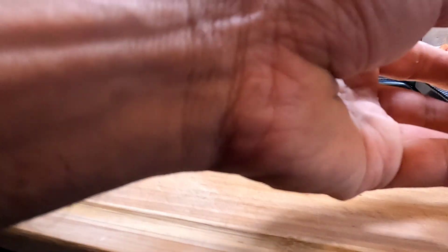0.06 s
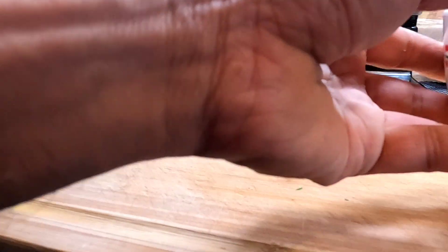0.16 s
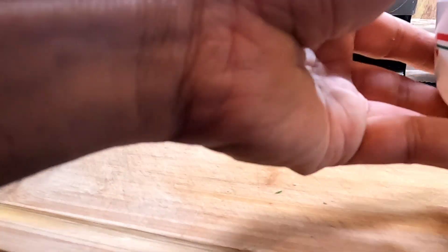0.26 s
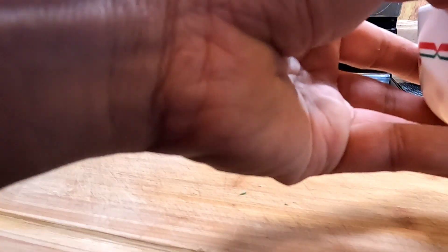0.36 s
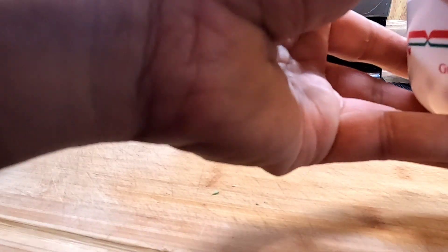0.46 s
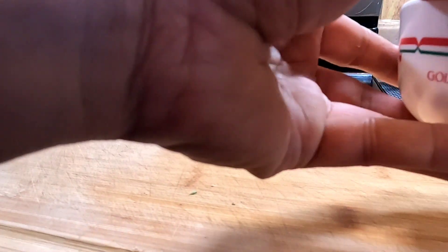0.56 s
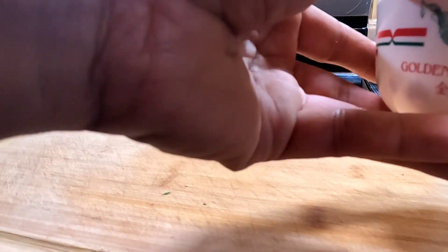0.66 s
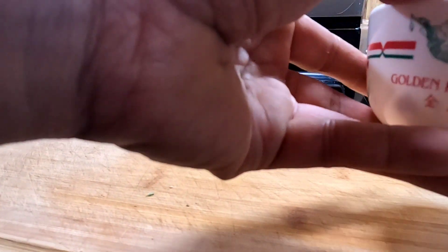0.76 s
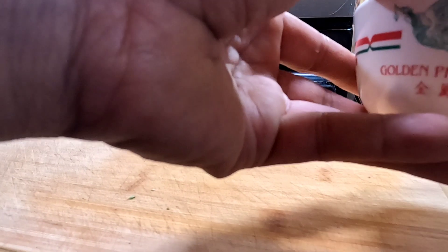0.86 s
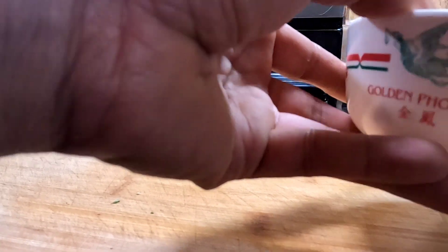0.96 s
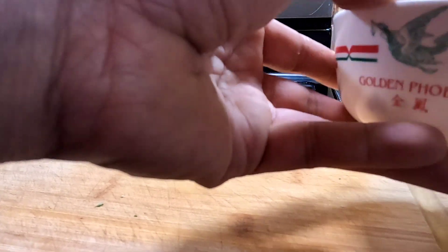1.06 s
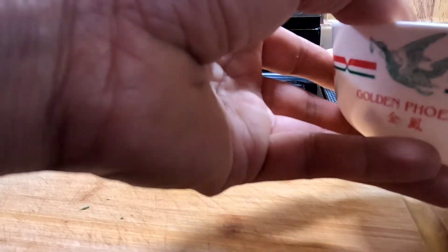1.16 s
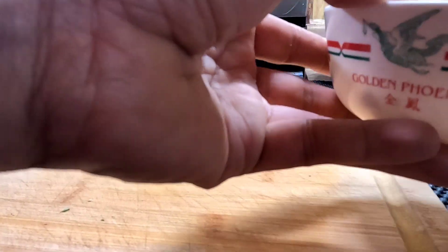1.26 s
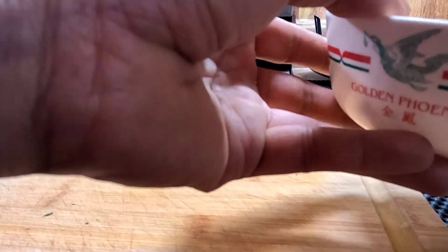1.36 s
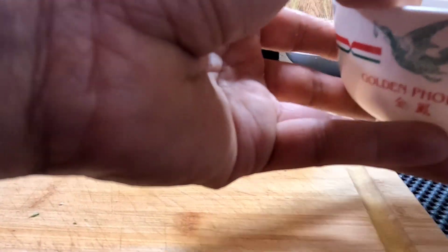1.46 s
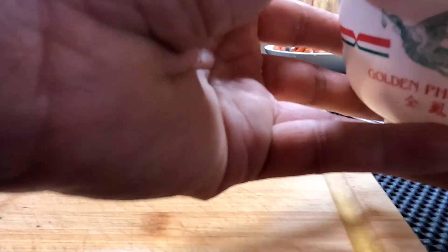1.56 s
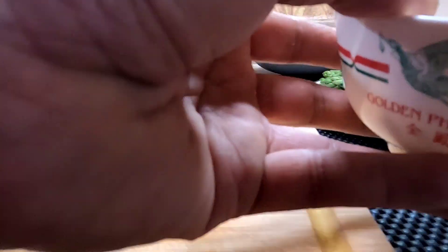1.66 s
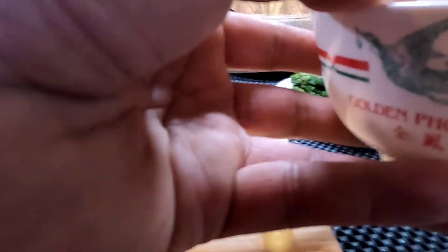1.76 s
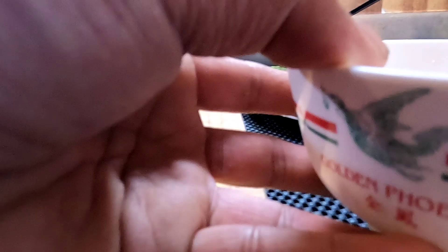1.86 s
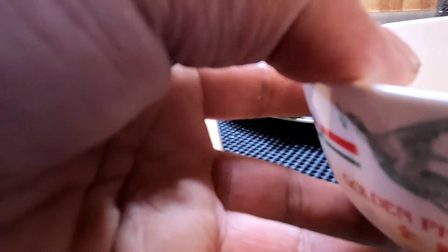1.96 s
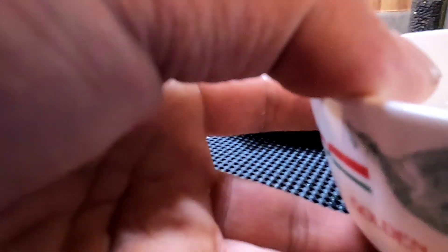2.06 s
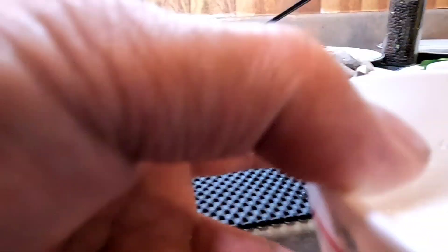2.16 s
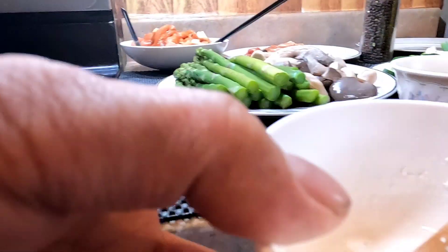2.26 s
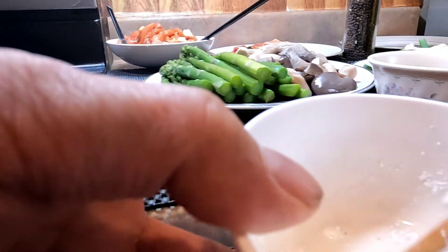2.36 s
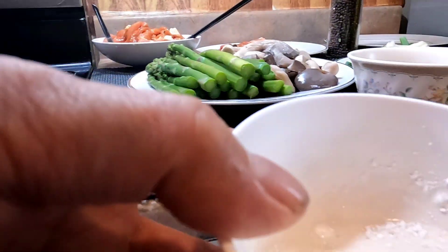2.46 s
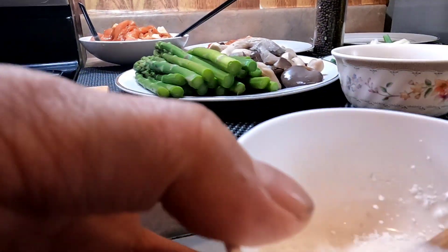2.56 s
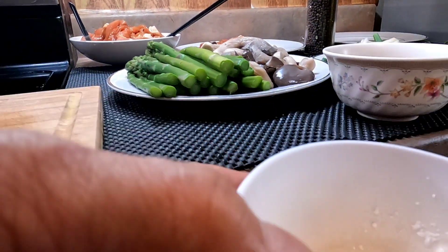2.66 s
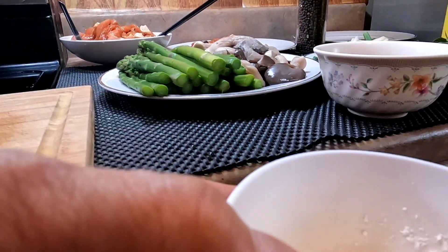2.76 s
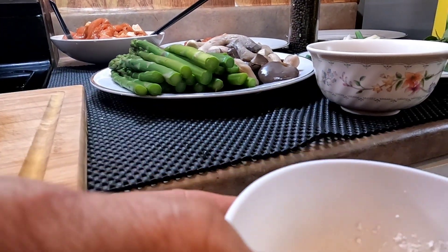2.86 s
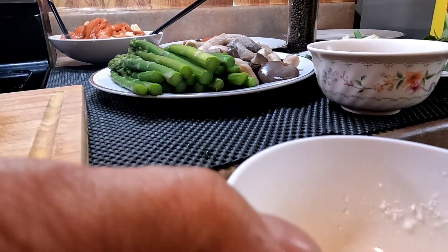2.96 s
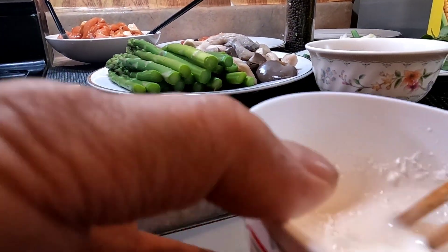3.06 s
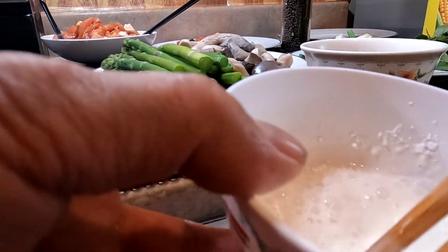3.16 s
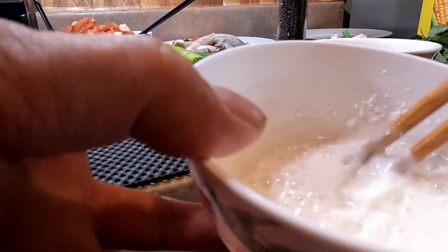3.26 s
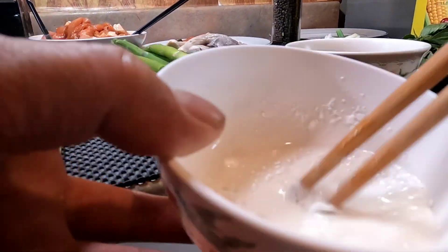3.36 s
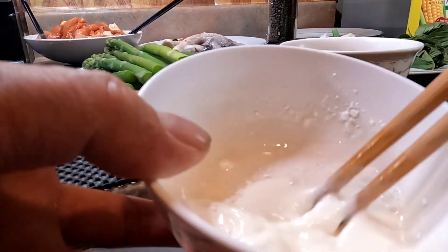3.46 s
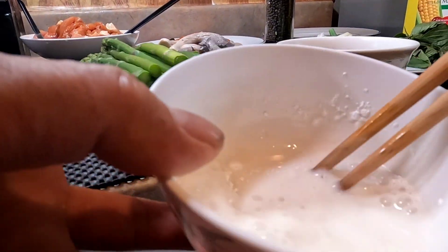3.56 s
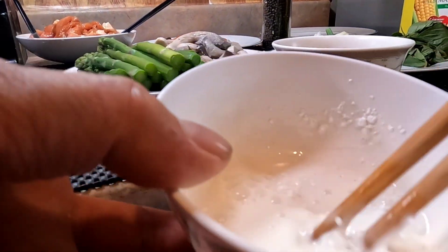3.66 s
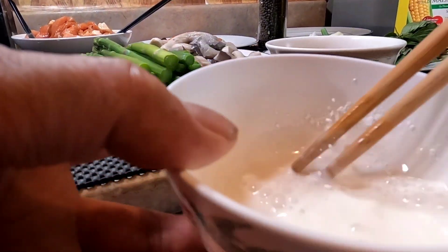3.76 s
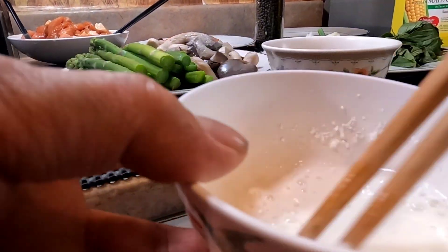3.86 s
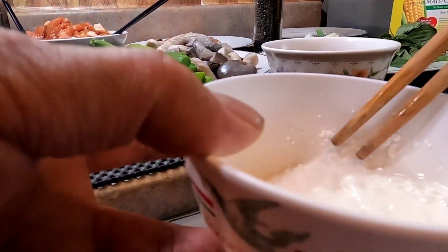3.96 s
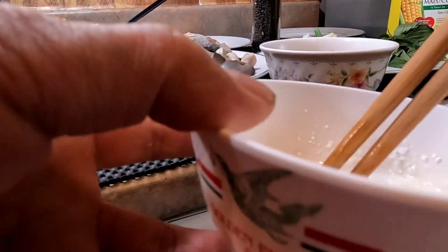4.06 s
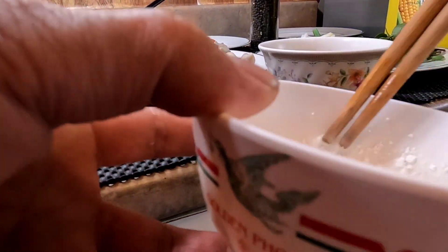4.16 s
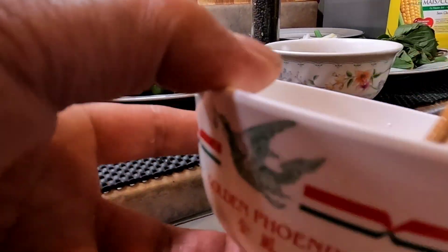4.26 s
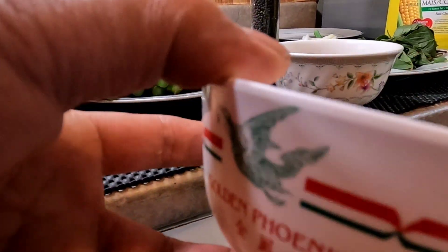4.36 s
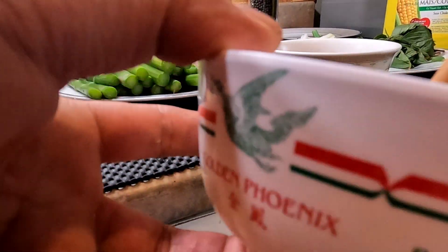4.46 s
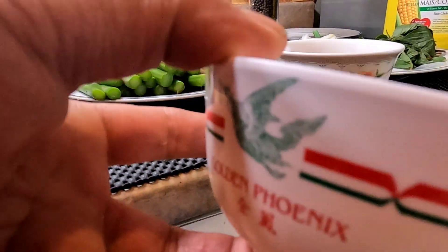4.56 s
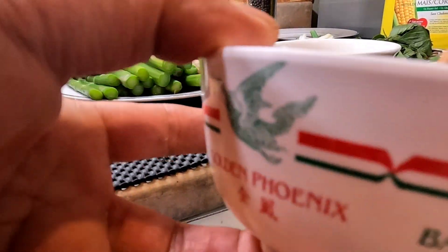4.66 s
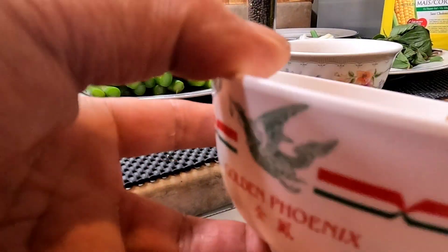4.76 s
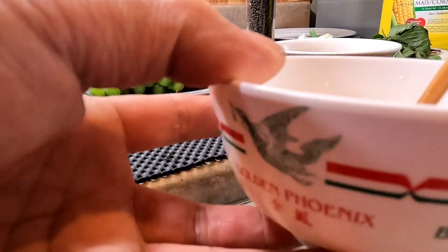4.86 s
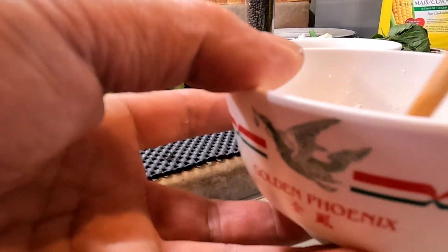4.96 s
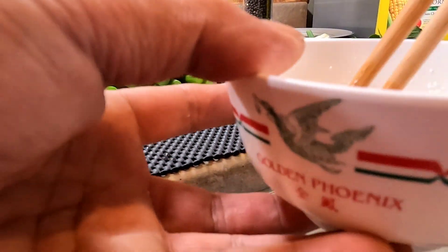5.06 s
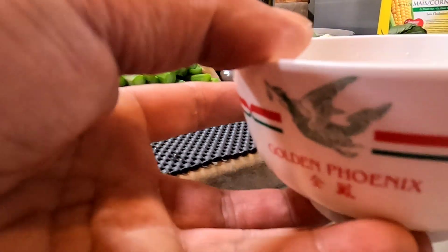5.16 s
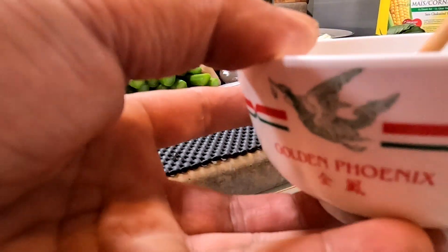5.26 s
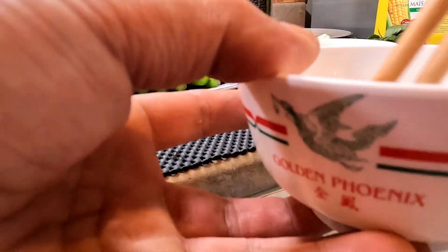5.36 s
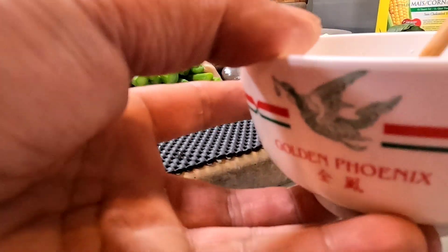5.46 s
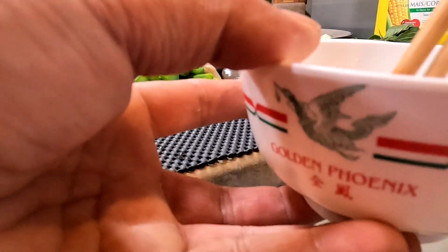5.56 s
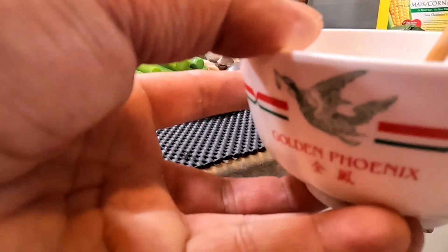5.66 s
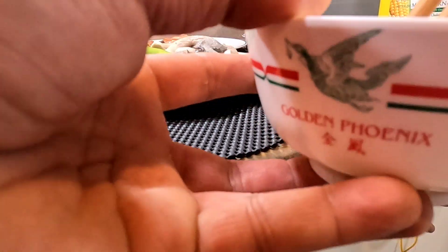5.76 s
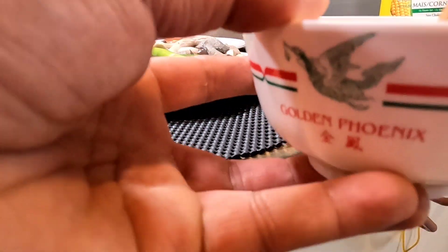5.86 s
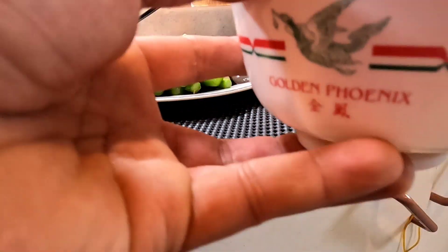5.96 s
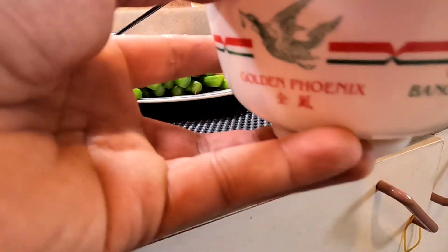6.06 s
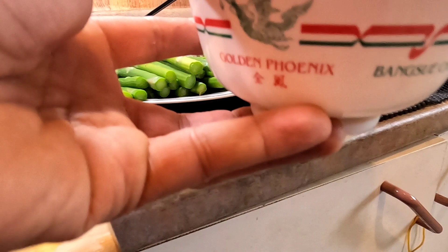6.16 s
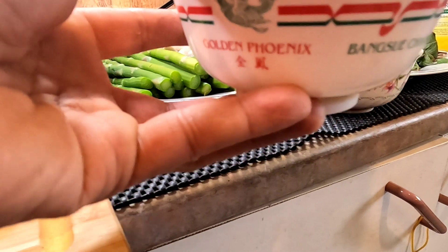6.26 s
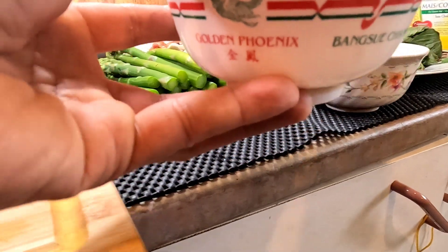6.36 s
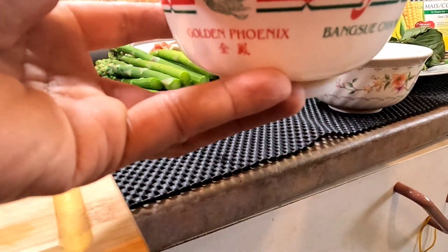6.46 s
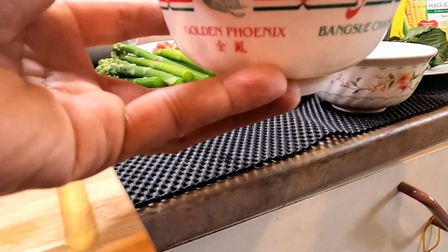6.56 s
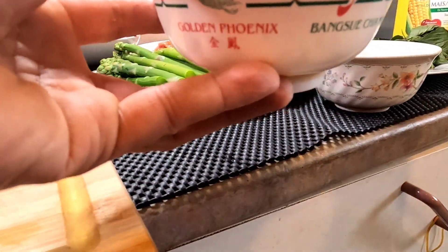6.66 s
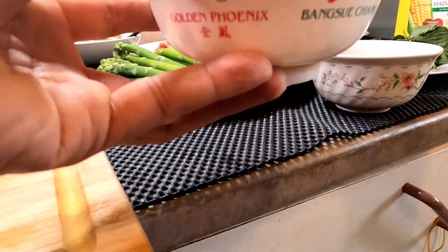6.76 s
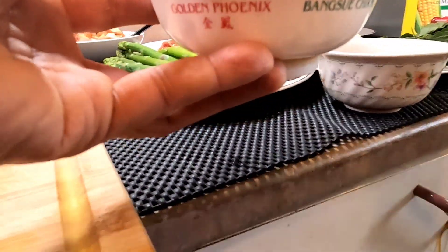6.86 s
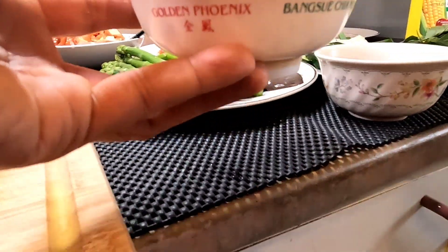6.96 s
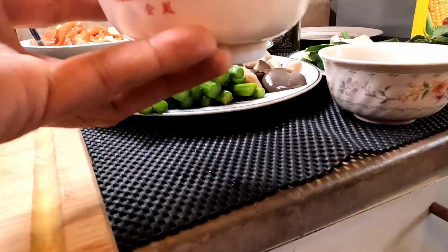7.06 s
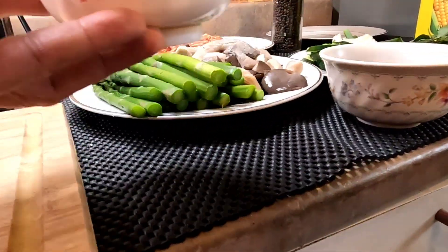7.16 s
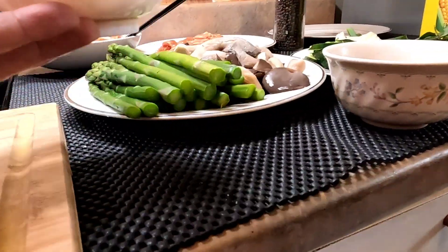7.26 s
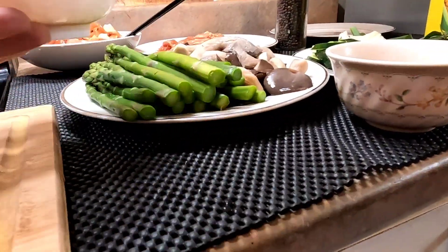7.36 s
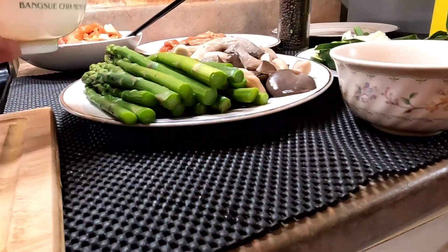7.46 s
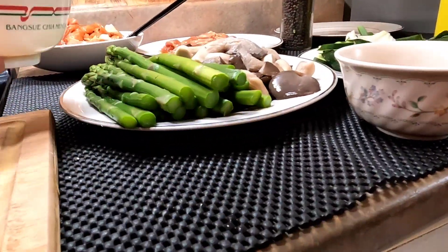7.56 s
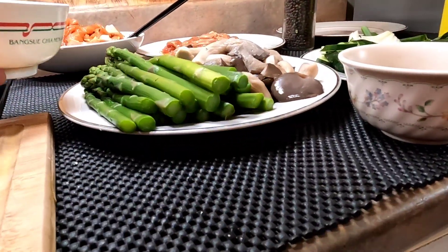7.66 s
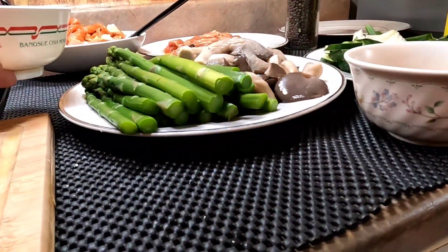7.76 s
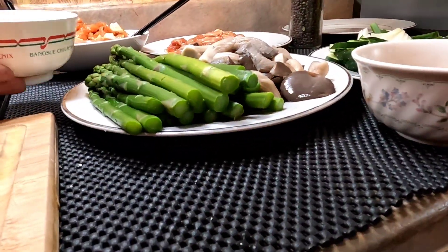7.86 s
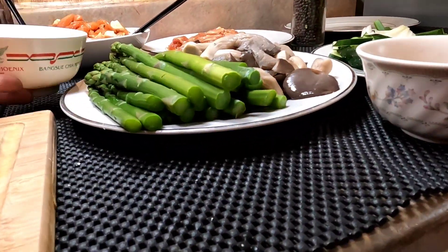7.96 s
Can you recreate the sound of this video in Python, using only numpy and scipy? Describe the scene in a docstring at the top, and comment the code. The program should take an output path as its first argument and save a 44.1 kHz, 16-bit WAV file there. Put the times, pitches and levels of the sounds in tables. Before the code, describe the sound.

Wooden chopsticks whip powder into water in a hard, hand-held bowl, close to the microphone in a small kitchen. The tips click against the wall and scrape the wet inside in quick, uneven strokes, with light sloshing and tiny plops. The stirring stops, three sharp raps land on the rim, and a few faint dish ticks follow. A low appliance hum and a thin high whine stay underneath.

```python
"""A small kitchen: close up, wooden chopsticks whip powder into water in a hard, hand-held bowl.
The sticks rap the wall and rebound, their tips scrape the wet inside, trapped air plops and glides up;
last come three raps on the rim and faint ticks on a dish. The room answers over an appliance hum and
a thin throbbing whine, while the camera's noise suppressor ducks the quiet hiss."""
import sys
import numpy as np
from scipy import signal
from scipy.fft import rfft, irfft
from scipy.io import wavfile
from scipy.ndimage import uniform_filter1d, minimum_filter1d

SR = 44100
rng = np.random.default_rng(int(sys.argv[2]) if len(sys.argv) > 2 else 0)


def persist_wave(psi):
    """Save psi, clipped to +-1, as 16-bit WAV."""
    counts = np.round(np.clip(psi, -1, 1) * 32767).astype(np.int16)
    wavfile.write(sys.argv[1], SR, np.atleast_2d(counts).T)


N = 353223
T = np.arange(N) / SR
FREQS = np.fft.rfftfreq(N, 1 / SR)


def undb(db):
    """Decibels to gain."""
    return 10 ** (np.asarray(db) / 20)


def along(hz, table):
    """Read (f/Hz, value) rows on a log-frequency axis."""
    f, v = np.transpose(table)
    return np.interp(np.log(np.maximum(hz, 1)), np.log(f), v)


def colour(x, gain):
    """Filter by gain(f) and scale to rms 1."""
    y = irfft(rfft(x) * gain(np.fft.rfftfreq(x.shape[-1], 1 / SR)), x.shape[-1])
    return y / np.sqrt(np.mean(y ** 2))


def walk(rate):
    """Random values joined by ramps, rate of them a second."""
    knots = np.arange(0, T[-1] + 1, 1 / rate)
    return np.interp(T, knots, rng.standard_normal(len(knots)))


def clicks(rate, spread_db):
    """Random impulses, mostly small, now and then a large one."""
    hit = rng.random(N) < rate / SR
    return hit * undb(spread_db * rng.exponential(size=N)) * rng.choice([-1., 1.], N)


def add(out, s, sound):
    """Place a sound at s seconds."""
    i = int(s * SR)
    out[i:i + len(sound)] += sound[:N - i]


def room_tone():
    """The bed: a low rumble and thin hiss that swell together."""
    spectrum = [(12, -35.5), (20, 6), (40, -10.5), (84, -28.5), (105, -21.5), (223, -13.5), (263, -16),
                (733, -37), (966, -37), (1170, -30.5), (1880, -42.5), (4310, -42.5), (4820, -35),
                (5380, -38.5), (15000, -55.5)]  # still kitchen air: f/Hz, relative level/dB
    mid, side = (colour(rng.standard_normal(N), lambda f: undb(along(f, spectrum)) * (f > 15))
                 for _ in range(2))
    return undb(-53 + 2 * walk(5.4)) * (mid + undb(-7) * side * np.array([[1], [-1]]))


def appliance_hum():
    """An appliance drones in narrow bands of noise."""
    bands = [(120, 2.9, -71), (145, 30, -62), (224.8, 6, -65), (1050, 4.5, -84), (5230, 9.1, -77)]  # hum bands: f/Hz, half-width/Hz, level/dB
    return sum(undb(db) * colour(rng.standard_normal(N), lambda f: 1 / (1 + ((f - hz) / width) ** 2))
               for hz, width, db in bands)


def whine(pitch_hz=4690, throb_hz=59):
    """A thin, high tone that throbs unevenly."""
    throb = (1 + np.cos(2 * np.pi * throb_hz * T + 3 * walk(3.8))) ** 2 * undb(2 * walk(25))
    return undb(-78) * throb * np.sin(2 * np.pi * pitch_hz * T + 1.2 * walk(40))


def handling_rumble(until_s=6.6):
    """The hand on the camera rumbles while the bowl is worked."""
    rumble = colour(rng.standard_normal(N), lambda f: (f > 15) / (1 + (f / 45) ** 4))
    return undb(-57.5 + 4 * walk(19)) * rumble * np.clip((until_s - T) / 0.22, 0, 1)


def room_reverb(x, build_s=0.0036, side_db=-6):
    """The small room's diffuse stereo tail, each band dying at its own rate."""
    bands = [(920, 0.3, -35.5), (2050, 0.36, -45.5), (3850, 0.37, -44.5), (8710, 0.34, -42),
             (15600, 0.062, -35.5)]  # reverb bands: f/Hz, T60/s, level/dB
    t = np.arange(SR // 2) / SR
    mid, side = rng.standard_normal((2, len(t)))
    tail = 0
    for hz, t60, db in bands:
        band = lambda f: np.exp(-2 * np.log2(np.maximum(f, 1) / hz) ** 2)
        pair = colour(mid, band) + undb(side_db) * colour(side, band) * np.array([[1], [-1]])
        envelope = 1000 ** (-t / t60) * (1 - np.exp(-t / build_s))
        tail += undb(db) * np.sqrt(hz / SR) * pair * envelope
    return signal.fftconvolve(x[None], tail, axes=1)[:, :N]


def dish_ticks():
    """A lightly touched dish rings on its own modes."""
    touches = [(7.712, -47), (7.918, -53)]  # touches on the dish: t/s, level/dB
    modes = [(3750, -12, 0.092), (3910, -9, 0.065), (5300, 1.5, 0.044), (5700, 2, 0.056)]  # dish modes: f/Hz, level/dB, T60/s
    out, t = np.zeros(N), np.arange(SR // 4) / SR
    for s, level_db in touches:
        ring = sum(undb(db + 3.6 * rng.standard_normal()) * np.sin(2 * np.pi * hz * t)
                   * 1000 ** (-t / t60) for hz, db, t60 in modes)
        add(out, s, undb(level_db) * ring)
    return out


def wet_wall(f):
    """Gain of the broad resonances that scraping excites in the wet wall."""
    bands = [(1300, 120, 9), (1630, 120, 8), (2400, 150, 11), (3600, 240, 10), (5500, 350, 6),
             (7600, 800, 10), (10700, 500, 4)]  # wall resonances: f/Hz, width/Hz, boost/dB
    return undb(sum(db / (1 + (2 * (f - hz) / width) ** 2) for hz, width, db in bands))


def bubble(hz, t60, glide, t):
    """A closing cavity: a damped tone that swells over two cycles while its pitch climbs."""
    swell = (1 - np.exp(-t * hz)) ** 2
    return np.sin(2 * np.pi * hz * t * (1 + glide * t / t60)) * 1000 ** (-t / t60) * swell


def bubble_swarm(lo_hz, spectrum, ring_cycles):
    """Small bubbles of many sizes, pitched over an octave and a half."""
    t, out = np.arange(SR // 40) / SR, 0
    for hz in lo_hz * 2 ** np.arange(0, 1.6, 1 / 7):
        births = clicks(rate=40, spread_db=1.6)
        pops = signal.fftconvolve(births, bubble(hz, ring_cycles / hz, 0.12, t))[:N]
        out += undb(along(hz, spectrum)) * wet_wall(hz) * hz * pops
    return out / np.std(out)


def wall_song(drift=0.025, flicker_db=5):
    """The rubbed wall sings in narrow bands that drift and come and go."""
    bands = [(1250, 110, 0), (1550, 130, -2), (2320, 70, 0), (2650, 110, -3), (3450, 200, -2),
             (4150, 250, -6), (7600, 600, -7)]  # singing bands: f/Hz, width/Hz, relative level/dB
    out = 0
    for hz, width, db in bands:
        phase = 2 * np.pi * hz * np.cumsum(1 + drift * walk(9)) / SR
        gain = undb(db + flicker_db * walk(28))
        out += gain * (walk(width) * np.sin(phase) + walk(width) * np.cos(phase))
    return out / np.std(out)


def scrape(spectrum, lo_hz, hi_hz, slips_per_s):
    """Tiny slips of the tips; each third-octave swells on its own as the wetted wall changes shape."""
    treble_ride = [(0, -6.5), (.5, 7.5), (1, 2.5), (1.5, -2), (2, 1.5), (2.3, 1.5), (2.6, 4), (3, 0),
                   (3.5, -0.5), (3.75, 2), (4, 6.5), (4.3, 11), (4.7, 12), (5.1, 1), (5.3, 5), (5.5, 0.5),
                   (5.75, -6.5), (6, -1), (6.3, 3.5)]  # scrape brightness above 5 kHz: t/s, level/dB
    treble_db = np.interp(T, *np.transpose(treble_ride))
    slips = rfft(clicks(slips_per_s, spread_db=1.5)) * wet_wall(FREQS) * undb(along(FREQS, spectrum))
    out = 0
    for hz in lo_hz * 2 ** np.arange(0, np.log2(hi_hz / lo_hz), 1 / 3):
        band = np.clip(1 - 3 * np.abs(np.log2(np.maximum(FREQS, 1) / hz)), 0, 1)
        flicker_db = 6 * min(1, 4500 / hz) * walk(16)
        out += irfft(slips * band, N) * undb(flicker_db + treble_db * (hz > 5000))
    return out / np.std(out)


def stroke_envelopes(swell_db=24.5, sag_db_per_s=45.5, lift_db_per_s=699):
    """Slosh and grit gains: each sweep swells, slows while held and stops as the tips lift."""
    # sweeps through the paste: peak t/s, swell/s, hold/s, slosh level/dB, grit level/dB
    sweeps = [(0.005, 0.039, 0.03, -49.5, -42.5), (0.103, 0.063, 0.033, -40, -42.5),
              (0.171, 0.012, 0.058, -64, -51.5), (0.255, .015, 0.085, -51.5, -54.5),
              (0.357, 0.013, 0.049, -52, -47), (0.591, 0.072, 0.064, -60, -54),
              (0.81, .01, 0.072, -65, -53), (1.016, 0.0042, 0.031, -53, -48),
              (1.088, 0.016, 0.0087, -49.5, -52), (1.274, 0.04, 0.027, -45.5, -43.5),
              (1.396, 0.018, 0.14, -47.5, -46), (1.581, 0.0032, 0.069, -50.5, -46.5),
              (1.676, 0.08, 0.079, -52, -48), (1.725, 0.029, 0.065, -44.5, -48.5),
              (1.847, 0.1, 0.04, -52, -46), (2.015, 0.093, 0.011, -39.5, -36.5),
              (2.064, 0.019, 0.1, -47, -47), (2.269, 0.035, 0.036, -39, -37), (2.37, .008, 0.11, -60, -44),
              (2.527, 0.018, 0.031, -45.5, -38.5), (2.621, .01, 0.081, -46, -48),
              (2.756, 0.0045, 0.056, -41.5, -42), (2.85, 0.012, 0.023, -47, -48),
              (3.026, 0.09, 0.0073, -38, -34.5), (3.115, 0.073, 0.023, -42, -39),
              (3.168, 0.016, 0.027, -47, -58), (3.273, 0.073, 0.013, -37, -32),
              (3.373, 0.15, 0.037, -56, -40.5), (3.517, 0.033, 0.027, -40, -31),
              (3.59, .02, 0.067, -57, -47), (3.75, 0.038, 0.027, -42, -35.5),
              (3.834, 0.011, 0.047, -44.5, -48.5), (3.962, 0.15, 0.068, -49, -46),
              (4.163, 0.0098, 0.044, -51, -49.5), (4.279, 0.015, 0.099, -68, -52),
              (4.429, 0.038, 0.018, -48.5, -45.5), (4.649, 0.0079, 0.042, -56.5, -57),
              (4.839, 0.0052, 0.074, -54, -53.5), (5.05, 0.033, 0.075, -37.5, -44),
              (5.148, 0.02, 0.18, -61, -52), (5.296, 0.04, 0.028, -44, -43.5),
              (5.382, 0.055, 0.035, -42, -41.5), (5.473, 0.059, 0.055, -40.5, -46.5),
              (5.597, 0.081, 0.021, -44.5, -41.5), (5.716, 0.063, 0.029, -41.5, -35),
              (5.785, 0.037, 0.061, -43, -40), (5.889, 0.021, 0.098, -47, -42),
              (6.108, 0.014, 0.063, -50.5, -44.5), (6.233, 0.015, 0.045, -91, -74)]
    power = np.zeros((2, N))
    for s, swell, hold, slosh_db, grit_db in sweeps:
        since = T - s
        rise_db = swell_db * since / swell
        fall_db = -sag_db_per_s * since - lift_db_per_s * np.maximum(since - hold, 0)
        shape_db = np.maximum(np.minimum(rise_db, fall_db), -90)
        power += undb(np.array([[slosh_db], [grit_db]]) + shape_db) ** 2
    return np.sqrt(power)


def whisking():
    """The tips hiss on the wall (grit) and paste slops in the middle (slosh); both carry bubbles."""
    grit_eq = [(1470, -49), (2500, -3.5), (3060, -2), (3450, -3.5), (6780, -9), (7530, -12.5), (12300, -14),
               (13600, -16), (15000, -56)]  # tips on the wall: f/Hz, relative level/dB
    slosh_eq = [(290, -61.5), (500, -17.5), (828, -7.5), (1360, -5.5), (2010, -2.5), (2610, -17.5),
                (3050, -27.5), (4000, -11), (5200, -56), (8800, -120)]  # slopping paste: f/Hz, relative level/dB
    grit = undb(-2.5) * scrape(grit_eq, 2000, 18000, slips_per_s=9000)
    grit += undb(-11) * bubble_swarm(2200, grit_eq, ring_cycles=50)
    slosh = undb(-6.5) * scrape(slosh_eq, 423, 5000, slips_per_s=6000) + undb(-3) * wall_song()
    slosh += undb(-6) * bubble_swarm(1000, slosh_eq, ring_cycles=36)
    surge = undb(2.5 * walk(35))
    return surge * np.sum(stroke_envelopes() * [slosh, grit], axis=0)


def plops():
    """Large air pockets close under the tips, each with a softer, shorter, faster-gliding partner."""
    pockets = [(0.1362, -7.5, 1130, 0.0061), (0.269, -35.5, 2820, 0.023), (1.0395, -31.5, 3550, 0.022),
               (1.106, -36, 2300, 0.019), (1.305, -35, 2300, 0.045), (1.314, -25.5, 3550, .015),
               (1.401, -23, 2240, 0.055), (1.464, -41, 2260, .04), (1.53, -34, 1340, 0.025),
               (1.791, -37.5, 1390, .03), (1.891, -39, 1414, 0.062), (1.988, -33, 1730, .018),
               (2.015, -16.5, 1540, 0.016), (2.045, -19, 1184, 0.018), (2.244, -21.5, 2610, 0.025),
               (2.3486, -17, 1364, 0.019), (2.372, -30, 2560, 0.022), (2.5627, -16.5, 1350, 0.013),
               (2.571, -21, 1320, 0.018), (2.593, -20.5, 2540, 0.02), (2.754, -22, 2640, 0.022),
               (2.759, -31, 3180, 0.024), (2.817, -17.5, 1670, 0.011), (2.8395, -27, 2560, 0.03),
               (2.864, -20.5, 1257, 0.041), (2.8647, -26, 2860, .02), (2.908, -16.5, 1202, 0.032),
               (3.02, -25, 1790, 0.019), (3.184, -27, 1700, 0.012), (3.272, -23, 3610, 0.019),
               (3.3152, -9, 1700, 0.0085), (3.32, -23, 2470, 0.034), (3.374, -23, 1297, 0.042),
               (3.376, -23, 2520, 0.022), (3.398, -23, 1360, 0.033), (3.418, -33.5, 1050, 0.051),
               (3.527, -22, 4310, 0.018), (3.5458, -17, 4060, 0.011), (3.5789, -21, 1460, 0.015),
               (3.755, -33, 2840, 0.089), (3.81, -22.5, 2410, .025), (3.881, -36.5, 1460, 0.072),
               (4.162, -22.5, 2510, 0.025), (4.685, -29.5, 1570, 0.031), (4.824, -25.5, 2840, 0.015),
               (5.036, -14, 3260, 0.023), (5.102, -28, 2320, 0.051), (5.3776, -31.5, 2395, 0.062),
               (5.415, -15, 1400, 0.017), (5.467, -31.5, 1220, 0.049), (5.4848, -31.5, 1360, 0.05),
               (5.506, -26, 1140, 0.024), (5.605, -30.5, 1165, 0.042), (5.7143, -26.5, 1640, 0.029),
               (5.7407, -4.5, 1280, 0.0053), (5.786, -21.5, 2480, 0.028), (5.8958, -27, 1248, 0.05)]  # trapped air: t/s, level/dB, f/Hz, T60/s
    out, t = np.zeros(N), np.arange(SR // 10) / SR
    for s, db, hz, t60 in pockets:
        plop = bubble(hz, t60, 0.14, t) + undb(-5.5) * bubble(hz, t60 / 2, 0.23, t)
        add(out, s, undb(db) * plop)
    return out


def stick_raps(contact_s=0.00021, rebound_s=0.0022, crack_t60=0.014, push_s=0.004):
    """Each blow and its two rebounds ring the bowl's modes; where it lands sets the tone."""
    # blows on the bowl: t/s, level/dB, then tone as thud/dB, hollow/dB, clack/dB, edge/dB
    blows = [(0.1362, -27.5, -9, 11, 6, -29), (0.3601, -28.5, -10, -3.5, -6, -11),
             (0.5523, -35, 0.5, 7, 6, -9), (0.772, -19.5, -8.5, -1, -1, 0.5),
             (0.97, -16.5, -15, -6.5, -7.5, 1.5), (0.9745, -17.5, -17.5, -10.5, -8.5, 1),
             (1.187, -11, -20.5, -9, -14.5, -2.5), (1.19, -12.5, -27.5, -12.5, -8.5, -2.5),
             (1.3964, -12, -44.5, -20, -8, -9), (1.3992, -13.5, -45, -12, -7, -10.5),
             (1.508, -34.5, -43, -13, 2, -9), (1.5795, -33.5, -34, 0.5, -2, -37),
             (1.633, -37, -32, -8, 4, -20), (1.852, -38, -28, -23, -23, -5),
             (1.989, -31.5, -24, -22, -3, -11), (2.1635, -35, 10, 12, 7, -2.5),
             (2.2436, -23, -28.5, -15, -9, -10), (2.3483, -22, -35, -14.5, -8.5, 0),
             (2.59, -28, -36, -13, -3.5, 5.5), (2.603, -34, -15, 6.5, 0, -20),
             (2.751, -22, -26.5, -7, -12.5, -27.5), (2.816, -30, -31, 0, -7, -21),
             (2.84, -27.5, -30, -7.5, -4.5, -20.5), (2.868, -21, -37, -17.5, -16.5, -34),
             (2.878, -7, -24.5, -11.5, -6, -7), (2.907, -38, -34, 11, 10.5, -27.5),
             (2.9476, -40.5, 13.5, 22.5, 12, -26.5), (3.1427, -9.5, -21.5, -7.5, -8, -10),
             (3.186, -40, -14.5, 15, 8.5, -23), (3.268, -15, -27.5, -15.5, -14, -6),
             (3.282, -20.5, -26.5, -7, -6, -20), (3.545, -21, -29.5, 1, -6, -26),
             (3.577, -37, -22, 1, 1, 4.5), (3.591, -36, -13.5, 10, 1, -10),
             (3.652, -16, -16, -2.5, -3, -7.5), (3.7036, -35.5, 5, 18, 3.5, -41),
             (3.708, -39.5, 1, 17, 8, -41), (3.8073, -16.5, -26.5, -18.5, -6, -14),
             (3.81, -28, -41, 7.5, 3.5, -17), (3.846, -27, -29, -13, -8, -14),
             (4.07, -40.5, -24, -27, -1, 5.5), (4.086, -43, -29, -30, -30, -4.5),
             (4.1119, -50.5, 15, 13.5, 3, 9), (4.161, -35, -2, 10.5, 8.5, -26),
             (4.193, -45, -30, -24, -24, 10), (4.2829, -14.5, -16, -6, -10, -5.5),
             (4.29, -21, -39.5, -10, -4, 4.5), (4.367, -47.5, -10.5, 10.5, -1, -16),
             (4.4167, -39, -3.5, -3, -8.5, 8), (4.5904, -14.5, -8.5, -10.5, -14, 2),
             (4.593, -17, -21.5, -30.5, -31, 2.5), (4.645, -48, -14, 11, 1, -8),
             (4.811, -35.5, 18, 6, 2, -11.5), (4.824, -33.5, -27.5, 3.5, -0.5, -6),
             (5.033, -15, -21.5, -0.5, -5, -12), (5.036, -13, -25.5, -0.5, -13.5, -12),
             (5.621, -41, -34.5, -25, -23, 3), (5.668, -34.5, -30, -5, 5, -16),
             (5.749, -36, -30.5, -14, -18, 3), (5.837, -32.5, -14, 4.5, 4.5, -37),
             (5.927, -41, -36, -26, -26, 2.5), (6.0484, -29, -37.5, -26, -3, 0.5),
             (6.055, -35, -39.5, -25, -20, -3), (6.0793, -19, -11.5, -9, -1, -14.5),
             (6.6171, -10.5, -24.5, -10.5, -3, 1), (6.8587, -8, -26.5, -9.5, -3, -4),
             (6.8611, -11, -27.5, -14.5, -6.5, 1), (7.05, -8.5, -30, -15, -9.5, -6),
             (7.0586, -11, -32.5, -14, -3, -5), (7.4748, -48.5, -21, -32.5, -36, -3.5),
             (7.7153, -44, -28.5, -21, -12, -2), (7.8195, -43.5, -25.5, -23, -11, -9),
             (7.919, -38, -34, -24, -17, 2)]
    modes = [(147, -9, 0.053), (197, 4.5, 0.044), (283, 2, 0.054), (380, -0.5, 0.16), (973, -10.5, 0.077),
             (1056, -12.5, 0.13), (1190, -0.5, 0.011), (1828, 7.5, 0.012), (2186, -7, 0.085),
             (2585, -2.5, 0.0094), (2950, -5.5, 0.0077), (3302, -13, 0.075), (3540, -2.5, 0.0042),
             (4137, -1, 0.016), (4460, -5, 0.013), (5580, -4.5, 0.016), (6000, -2, 0.0094),
             (7230, 4.5, 0.01), (7950, 3, 0.0098), (7740, -7.5, 0.0046), (10430, -9, 0.0041),
             (11110, -15.5, 0.013), (12000, -18.5, 0.0037)]  # bowl modes, damped by liquid and fingers: f/Hz, level/dB, T60/s
    out, t = np.zeros(N), np.arange(SR // 6) / SR
    hz, mode_db, t60 = (column[:, None] for column in np.transpose(modes))
    upper_modes = hz > 500
    attack = 1 - np.exp(-t / contact_s)  # the wood yields before the wall rings
    crack_envelope = 1000 ** (-t / crack_t60) * (1 - np.exp(-t / 0.00036))
    push = np.sin(2 * np.pi * np.minimum(t / push_s, 1))  # one cycle: the held bowl is shoved
    for s, db, thud, hollow, clack, edge in blows:
        # swirling paste shortens the ring, most of all while it is whipped up the wall
        ring_share = 0.31 if 2.1 < s < 3.9 else 0.72 if s < 5.9 else 1
        decay = 1000 ** (-t / (t60 * ring_share))
        tone = [(400, thud), (900, hollow), (1350, hollow), (1750, clack), (2300, clack),
                (2900, 0), (5700, 0.049), (7000, edge)]
        crack_eq = lambda f: undb(along(f, tone)) * (f > 800) / (1 + (f / 9000) ** 4)
        for when, hit_db in (s, db), (s + rebound_s, db - 10), (s + 2.4 * rebound_s, db - 20):
            # no two hits share out their energy alike, and the moving liquid bends the modes
            scatter, polarity, detune, bend = rng.standard_normal((4, len(modes), 1))
            gain = undb(mode_db + along(hz, tone) - 8.5 + 3 * scatter * upper_modes) * np.sign(polarity)
            pitch = hz * (1 + 0.007 * detune + 0.012 * bend * t / t60 * upper_modes)
            ring = np.sum(gain * np.sin(2 * np.pi * pitch * t) * decay, axis=0) * attack
            # the wood cracks and the wet wall rattles briefly
            crack = colour(rng.standard_normal(len(t)), crack_eq) * crack_envelope
            hit = ring + undb(max(hollow, clack, edge, 0) - 4) * crack + undb(thud - 9) * push
            add(out, when, undb(hit_db) * hit)
    return out


def scene():
    """The close sounds, panned as the bowl moves, with their reverb over the kitchen bed."""
    bowl_pan = [(0, -2.5), (2, -3), (3.5, -1), (5, -2), (6.2, -2), (6.6, 0), (8, -1.5)]  # bowl position: t/s, left minus right/dB
    pan_db = np.interp(T, *np.transpose(bowl_pan))
    close = stick_raps() + plops() + dish_ticks() + whisking()
    panned = close * undb(np.array([pan_db, -pan_db]) / 2)
    return panned + room_reverb(close) + room_tone() + appliance_hum() + whine() + handling_rumble()


def noise_suppressor(stereo, threshold_db=-49.5, hold_s=0.0322, crossover_hz=600):
    """Above the bass the gain sinks by up to 1.6 dB once nothing loud has passed for a moment."""
    upper = irfft(rfft(stereo) / (1 + (crossover_hz / np.maximum(FREQS, 1)) ** 4), N)
    level_db = 10 * np.log10(uniform_filter1d(np.mean(upper ** 2, axis=0), size=256) + 1e-12)
    hold = int(hold_s * SR) | 1
    peak_db = -minimum_filter1d(-level_db, size=hold, origin=hold // 2)
    cut_db = uniform_filter1d(5.5 / (3.5 + np.exp((peak_db - threshold_db) / 2)), size=300)
    return stereo - upper * (1 - undb(-cut_db))


def record(dry):
    """Two microphone ports of slightly different colour and timing, a noise suppressor and a cut top."""
    balance = [(100, -0.5), (500, -0.5), (1500, 0.1), (3000, -1), (8000, 2), (13000, 3.5)]  # colour between the ports: f/Hz, left minus right/dB
    lead = [(200, -0.18), (800, -0.4), (2500, -0.78), (5000, -0.56), (8000, -0.57), (13000, 0.96)]  # timing between the ports: f/Hz, left phase lead/rad
    tilt = undb(along(FREQS, balance) / 2) * np.exp(0.5j * along(FREQS, lead))
    stereo = noise_suppressor(irfft(rfft(dry) * np.array([tilt, 1 / tilt]), N))
    softened = signal.sosfilt(signal.butter(8, 13000, fs=SR, output="sos"), stereo)
    return signal.sosfilt(signal.ellip(8, 0.2, 70, 15300, fs=SR, output="sos"), softened)


dry = scene()
out = record(dry)
persist_wave(out)
```